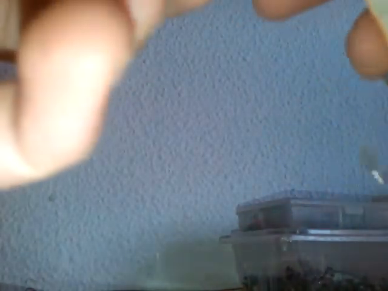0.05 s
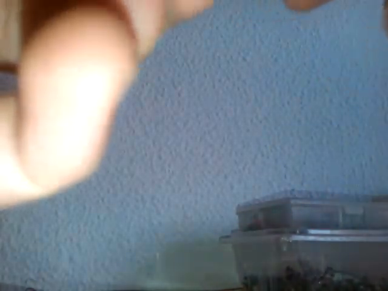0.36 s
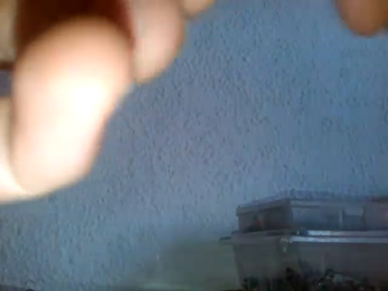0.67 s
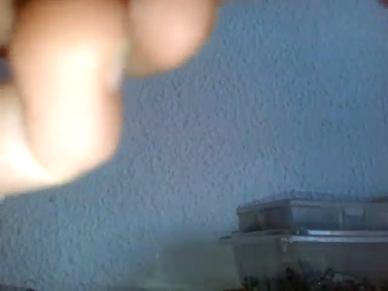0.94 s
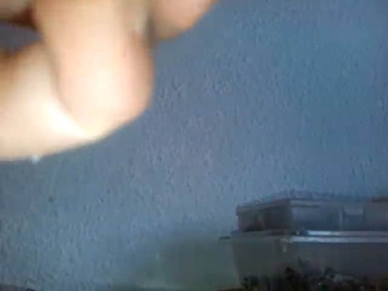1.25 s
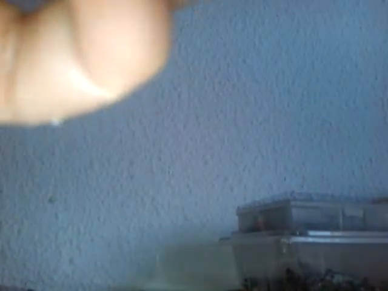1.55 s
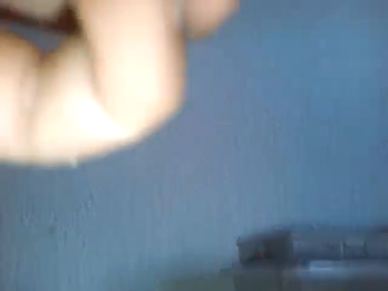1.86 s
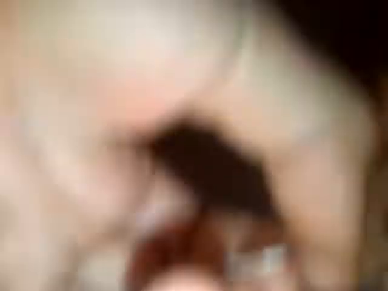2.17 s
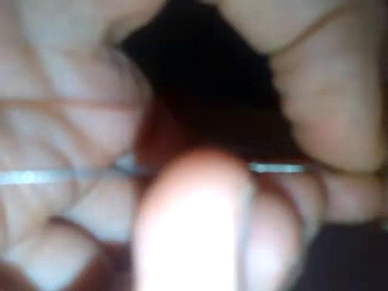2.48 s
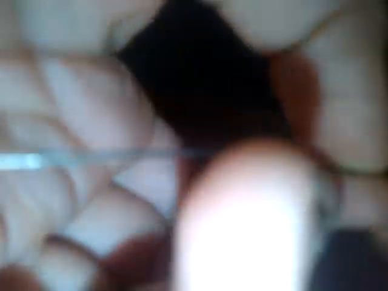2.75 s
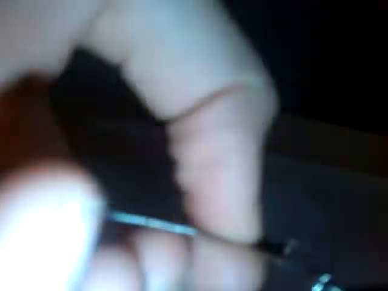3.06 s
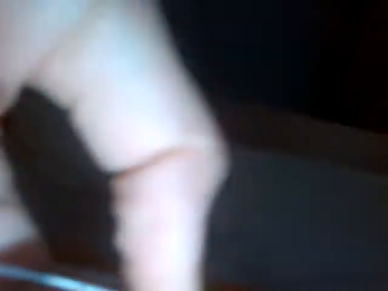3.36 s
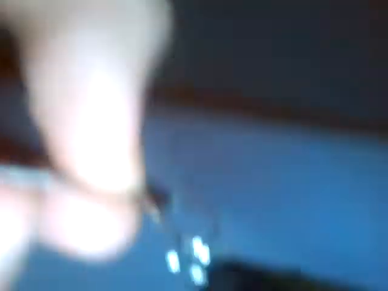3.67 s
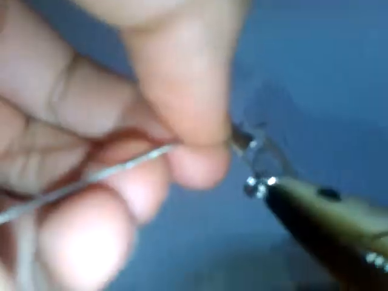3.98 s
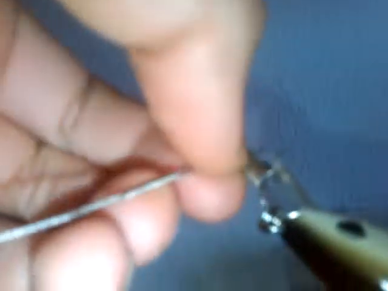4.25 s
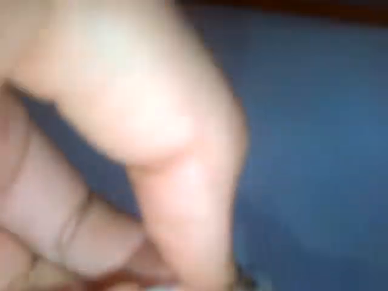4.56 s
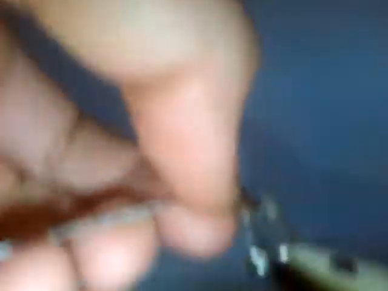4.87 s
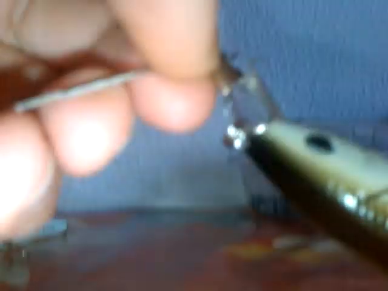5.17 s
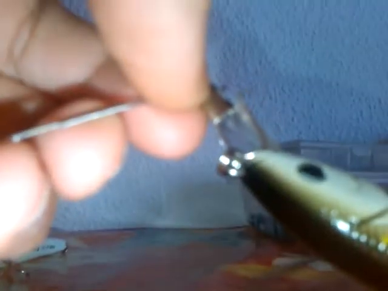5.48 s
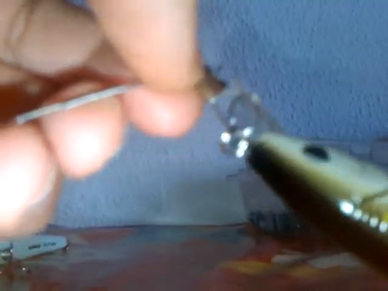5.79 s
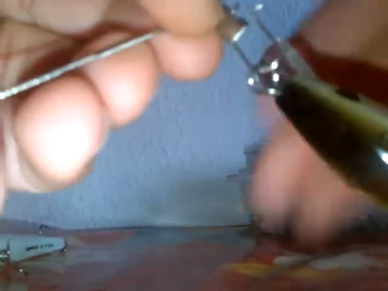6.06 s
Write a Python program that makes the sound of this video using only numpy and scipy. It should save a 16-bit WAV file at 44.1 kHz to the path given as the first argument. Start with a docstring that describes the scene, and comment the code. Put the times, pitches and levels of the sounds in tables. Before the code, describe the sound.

Fishing tackle is handled very close to a small microphone, dry, over quiet room tone and hiss. Hooks jingle briefly at 0.3 seconds, and a sharp metal click follows at 0.7, then faint ticks. Near 1.9 a clip clicks and steel wire judders and hisses through the fingers, followed at 2.1 by a loud snap, a hollow knock of the lure and a hand bumping the microphone. A short, squeaky zip comes at 2.2. From 2.5 to 3.4 small rings tick irregularly while a swivel grinds finely and hands brush softly. At 3.7 the wire hisses and squeaks again, stopping with a loud snap at 3.8. After a few light ticks, another swelling zip ends in a hard snap just before 5. The hardest snaps overload slightly. Sparse soft ticks and faint swivel scraping continue until about 6.3.

```python
"""Steel snap and rings click as a fishing lure is clipped to a leader, close to a small microphone.
Each click is a damped metal tick with a short steel ring and a knock in the hollow lure.
Hooks jingle, the swivel grinds, and the wire hisses and squeaks through the fingers, then stops
with a loud snap. Hands brush and bump, once against the microphone, over a quiet room tone.
The hardest snaps overload the input."""
import sys
import numpy as np
from scipy import signal
from scipy.fft import rfft, irfft, next_fast_len
from scipy.io import wavfile

SR = 44100
rng = np.random.default_rng(int(sys.argv[2]) if len(sys.argv) > 2 else 0)


def inscribe(sig):
    """Save sig as 16-bit PCM at rate SR to the path in sys.argv[1].

    A 1-D sig is mono; a 2-D sig holds one channel per row.
    Samples are clipped to [-1, 1] before scaling.
    """
    pcm = np.round(np.clip(np.atleast_2d(sig).T, -1, 1) * 32767)
    wavfile.write(sys.argv[1], SR, pcm.astype(np.int16))


N = 278855
TIME = np.arange(N) / SR
AGE = np.arange(SR // 8) / SR   # seconds since a contact


def from_db(db):
    """Decibels to gain."""
    return 10 ** (np.asarray(db) / 20)


def rms_one(x):
    """Scale to unit power."""
    return x / np.sqrt(np.mean(x ** 2) + 1e-20)


def peak_one(x):
    """Scale to unit peak."""
    return x / np.abs(x).max()


def fade(t60):
    """Decay after a contact: 60 dB down in t60 seconds."""
    return from_db(-60 * AGE / t60)


def add(out, s, sound):
    """Mix a one-shot in at s seconds."""
    at = round(s * SR)
    out[at:at + len(sound)] += sound[:N - at]


def cut(x, hz, kind, order=2):
    """Butterworth low- or high-pass."""
    return signal.sosfilt(signal.butter(order, hz, kind, fs=SR, output="sos"), x)


def low_noise(hz, size=N):
    """Low-passed noise at unit power."""
    return rms_one(cut(rng.standard_normal(size), hz, "low"))


def resonate(x, hz, width_hz):
    """One resonance with unit gain at its peak."""
    radius = np.exp(-np.pi * width_hz / SR)
    feedforward = np.array([1, 0, -1]) * (1 - radius ** 2) / 2
    feedback = [1, -2 * radius * np.cos(2 * np.pi * hz / SR), radius ** 2]
    return signal.lfilter(feedforward, feedback, x + 1e-18)


def ring(x, modes):
    """Parallel modes of one object; alternating signs keep the far skirts dark."""
    return sum((-1) ** k * from_db(db) * resonate(x, hz, width)
               for k, (hz, width, db) in enumerate(modes))


def colour(x, spectrum):
    """Shape noise with an EQ curve; unit power."""
    hz, db = np.transpose(spectrum)
    size = next_fast_len(N)
    bins = np.maximum(np.fft.rfftfreq(size, 1 / SR), 1)
    eq = from_db(np.interp(np.log(bins), np.log(hz), db))
    return rms_one(irfft(rfft(x, size) * eq, size)[:N])


def grains(per_s, spread_db, size=len(AGE)):
    """Random micro-contacts of uneven strength."""
    strength = from_db(spread_db * np.minimum(rng.exponential(1, size), 4))
    return strength * rng.choice([-1, 1], size) * (rng.random(size) < per_s / SR)


def tick(x, hz, width_hz, skirt_db=-16):
    """Metal pinched between fingers: one heavily damped resonance with broad skirts."""
    core = resonate(resonate(x, hz, width_hz), hz, width_hz)
    skirt = from_db(skirt_db) * resonate(x, 3700, 2900)
    edge = from_db(-30) * cut(x, 11000, "high")
    return core + skirt + edge


def strokes(rows, attack_s):
    """Rubbing envelope: each stroke sets in, ramps by its swell to its end level, and lets go."""
    out = np.zeros(N)
    for start, end, db, swell, release in rows:
        onset = np.clip((TIME - start) / attack_s, 0, 1)
        to_go = np.clip((end - TIME) / (end - start), 0, 1)
        let_go = np.clip(1 - (TIME - end) / release, 0, 1) ** 2
        out += onset * from_db(db - swell * to_go) * let_go
    return out


# room tone EQ: f/Hz, level/dB
ROOM_EQ = [(15, -34.5), (25, -12.5), (54, -5), (76, -10.5), (145, 2), (210, -5), (275, -5), (318, -9.5),
           (416, -1), (452, -10), (491, -3), (544, -7.5), (604, -6.5), (1500, -12), (3500, -23),
           (4550, -59), (7700, -120)]
# fader rides on the distant room noise: t/s, low band/dB, mid band/dB
ROOM_RIDES = [(0.0, -62.5, -63), (0.65, -63.5, -65), (0.88, -59.5, -64), (1.34, -66, -72),
              (1.78, -64, -68.5), (2.11, -56.5, -58.5), (2.41, -63, -62.5), (2.64, -60.5, -60.5),
              (4.08, -60, -62), (4.93, -64.5, -67), (5.32, -63.5, -67.5), (6.32, -58.5, -61)]
# drone partials: f/Hz, level/dB
DRONE = [(50, -76.5), (147, -77), (272, -74), (410, -78), (495, -77)]


def room(crossover_hz=500, air_trim_db=1, drone_trim_db=-3, hiss_db=-64.5):
    """The bed: dull room noise and a faint drone, over even microphone hiss."""
    low = cut(colour(rng.standard_normal(N), ROOM_EQ), crossover_hz, "low", order=4)
    mid = cut(colour(rng.standard_normal(N), ROOM_EQ), crossover_hz, "high", order=4)
    mid = cut(mid, 3200, "low", order=4)
    times, low_db, mid_db = np.transpose(ROOM_RIDES)
    air = from_db(np.interp(TIME, times, low_db)) * rms_one(low)
    air += from_db(np.interp(TIME, times, mid_db)) * rms_one(mid)
    drone = sum(from_db(db) * np.sqrt(2) * np.sin(2 * np.pi * hz * TIME + low_noise(5))
                for hz, db in DRONE)
    hiss = from_db(hiss_db) * rng.standard_normal(N)
    return from_db(air_trim_db) * air + from_db(drone_trim_db) * drone + hiss


# swivel turning on its rings: start/s, end/s, end level/dB, swell/dB, release/s
SWIVEL_TURNS = [(.73, .78, -64.5, -2, 0.092), (2.52, 2.68, -65, -1, .2), (2.8, 2.94, -56, 18.5, .03),
                (2.945, 2.988, -47.5, -5, 0.034), (3.098, 3.14, -53, -7, .1), (3.2, 3.43, -54, 9, 0.11),
                (4.02, 4.05, -65, 2, .06), (4.14, 4.16, -52.5, 4, 0.11), (4.23, 4.255, -58, 1.5, .05),
                (5.73, 5.89, -62, 15, 0.12), (6.1, 6.32, -60.5, 10, 0.058)]
# swivel resonances: f/Hz, width/Hz, level/dB
SWIVEL_MODES = [(2870, 180, -9), (3060, 140, -6.5), (4244, 1300, -8.5), (5440, 460, -6.5), (6420, 640, -4),
                (7100, 150, 2), (7530, 880, -9.5), (9800, 900, -21)]


def swivel():
    """A fine grind: tiny catches come in clumps and set the turning swivel ringing."""
    clumps = from_db(2.6 * low_noise(70))
    catches = clumps * grains(per_s=1600, spread_db=3.6, size=N)
    grind = rms_one(cut(ring(catches, SWIVEL_MODES), 9500, "low", order=4))
    return strokes(SWIVEL_TURNS, attack_s=0.015) * grind


# fingertip squeaks on the wire: t/s, length/s, start f/Hz, end f/Hz, level/dB
FINGER_SQUEAKS = [(2.02, .016, 2535, 2800, -47), (2.245, 0.019, 2350, 2790, -40.5),
                  (3.754, 0.014, 2170, 1760, -44.5), (3.78, 0.011, 2530, 2680, -40.5),
                  (4.918, 0.022, 677, 870, -49.5)]


def squeaks(waver=0.035):
    """Friction briefly locks into a gliding, unsteady chirp."""
    out = np.zeros(N)
    for s, length, start_hz, end_hz, db in FINGER_SQUEAKS:
        size = round(length * SR)
        hz = np.linspace(start_hz, end_hz, size) * (1 + waver * low_noise(400, size))
        chirp = np.sqrt(2) * np.sin(2 * np.pi * np.cumsum(hz) / SR)
        add(out, s, from_db(db) * np.hanning(size) * chirp)
    return out


def judder(start_s=1.872, end_s=1.985, slips_per_s=72):
    """Skin sticks to the wire, drags and slips: a low sawtooth with a tick at each slip."""
    phase = np.cumsum(slips_per_s * (1 + .04 * low_noise(30))) / SR
    drag = (phase - phase[round(start_s * SR)]) % 1
    slips = np.diff(drag, prepend=0) < -.5
    buzz = cut(2 * drag - 1, 170, "low")
    ticks = peak_one(tick(slips.astype(float), hz=5600, width_hz=5000))
    gate = np.clip(np.minimum(TIME - start_s, end_s - TIME) / .02, 0, 1)
    return gate * (from_db(-44) * buzz + from_db(-36) * ticks)


PULL_ATTACK_S = .024   # time for the wire to get moving
# wire drawn through the fingers: start/s, end/s, end level/dB, swell/dB, release/s
WIRE_PULLS = [(1.9, 2.037, -37, 25.5, 0.031), (2.06, 2.13, -51, -5.5, .14), (2.215, 2.265, -36, 12.5, 0.14),
              (3.692, 3.84, -32, 11, .035), (4.82, 4.945, -35.5, 24.5, .02)]
# bright friction EQ of the wire: f/Hz, level/dB
WIRE_EQ = [(900, -30.5), (1800, -14.5), (2700, -8), (3400, -5.5), (5200, -2.5), (7200, 0.5), (10000, -6.5),
           (11500, -11.5), (13500, -26.5), (16000, -30)]


def wire():
    """A zipping hiss: twisted strands catch on skin thousands of times a second, under a wavering grip."""
    grip = from_db(1.6 * low_noise(160))
    friction = colour(grains(per_s=6000, spread_db=4.1, size=N), WIRE_EQ)
    return strokes(WIRE_PULLS, PULL_ATTACK_S) * grip * friction


# hand thumps and hollow lure knocks: t/s, level/dB, f/Hz
THUMPS_AND_KNOCKS = [(1.8613, -33, 510), (2.071, -3.5, 183), (2.07, -5.5, 665), (2.0706, -5, 1380),
                     (2.075, -12, 380), (2.09, -15.5, 455), (2.118, -29, 130), (2.223, -30, 89),
                     (3.13, -31.5, 132), (3.148, -33, 83), (3.153, -30, 219), (3.1537, -26, 1540),
                     (3.1997, -37.5, 590), (3.8384, -22.5, 400), (3.84, -19.5, 899), (4.392, -39, 110),
                     (4.9494, -21.5, 379), (4.9487, -20.5, 1100), (4.951, -30, 140)]


def thumps_and_knocks():
    """Quickly damped tones: dull thumps of the hands, and hollow knocks of the lure at the loud snaps."""
    out = np.zeros(N)
    for s, db, hz in THUMPS_AND_KNOCKS:
        t60 = 0.016 * (300 / hz) ** 0.41   # higher tones die sooner
        tone = np.sin(2 * np.pi * hz * AGE)
        rustle = from_db(-17) * low_noise(2000, len(AGE))
        add(out, s, from_db(db) * fade(t60) * (tone + rustle))
    return out


# hand brushing the casing: start/s, end/s, end level/dB, swell/dB, release/s
HAND_BRUSHES = [(2.06, 2.13, -42.5, -12, 0.069), (2.215, 2.33, -60.5, -1, .08),
                (2.94, 2.965, -49.5, 3.5, 0.024), (3.1, 3.15, -53.5, 7.5, 0.28),
                (3.825, 3.845, -46, 7, .04), (4.93, 4.952, -41.5, 15.5, 0.018)]
# muffled EQ of the casing: f/Hz, level/dB
CASING_EQ = [(30, 1), (100, 1.5), (250, -3), (500, -6), (1000, -6), (1700, -12), (3000, -27), (8000, -50.5)]


def brushes(wire_bleed_db=-26):
    """Handling noise: skin brushes the casing, and the hand carries the wire's friction into it."""
    rubbing = strokes(HAND_BRUSHES, attack_s=.012)
    bleed = from_db(wire_bleed_db) * strokes(WIRE_PULLS, PULL_ATTACK_S)
    return (rubbing + bleed) * colour(grains(per_s=3000, spread_db=5.6, size=N), CASING_EQ)


# hooks swinging into each other: t/s, level/dB
HOOK_HITS = [(0.2959, -23), (0.3003, -26), (0.3023, -35), (0.3067, -39), (0.3151, -36), (0.3322, -32.5),
             (0.3443, -37.5), (0.423, -44)]
# hook resonances: f/Hz, width/Hz, level/dB
HOOK_MODES = [(2800, 145, -8), (4700, 400, -10), (5840, 220, -6), (6300, 160, -1), (7700, 580, -4),
              (8500, 360, -9), (9540, 360, 5), (10130, 270, -16), (11400, 1200, -19), (12900, 2400, -8.5)]


def hooks():
    """A bright jingle: free hooks strike, then shiver on their rings."""
    out = np.zeros(N)
    strike = from_db(-1) * peak_one(ring(signal.unit_impulse(len(AGE)), HOOK_MODES))
    burst_and_tail = from_db(-3) * fade(0.0083) + from_db(-19) * fade(0.095)
    for s, db in HOOK_HITS:
        shiver = rms_one(ring(grains(per_s=7000, spread_db=1.5), HOOK_MODES))
        add(out, s, from_db(db) * (strike + burst_and_tail * shiver))
    return out


# resonances of the steel parts: f/Hz, width/Hz, level/dB
STEEL_MODES = [(2748, 130, 3), (3322, 200, -2.5), (4400, 600, -8.5), (5600, 280, -10), (6586, 350, -0.5),
               (7123, 180, -12.5), (7840, 250, -1.5), (10250, 550, -12.5), (13600, 670, -16)]
# resonances of the hollow lure: f/Hz, width/Hz, level/dB
LURE_MODES = [(410, 140, 0.5), (830, 200, -0.5), (1030, 370, -1), (1500, 260, -1.5), (2270, 400, 1)]
# snap, swivel and rings touching: t/s, tick level/dB, f/Hz, width/Hz, ring send/dB, knock send/dB
METAL_HITS = [(0.6656, -6.5, 6120, 3200, -62, -39), (0.715, -46, 3800, 7000, -48.5, -48),
              (0.724, -36, 7750, 4200, -46.5, -66), (1.3153, -48, 6800, 3000, -57, -70),
              (1.333, -39.5, 3680, 2400, -55.5, -68), (1.4268, -40, 6500, 3200, -55.5, -66),
              (1.4677, -34.5, 6200, 7000, -55, -66), (1.8205, -39, 10400, 1800, -49, -68),
              (1.845, -29, 5200, 7000, -58, -66), (1.8504, -26, 3750, 7000, -40, -50),
              (1.8542, -8.5, 5370, 3400, -54, -26), (1.8605, -20.5, 5650, 2420, -39, -22),
              (2.0583, -27, 6200, 7000, -47, -47), (2.0666, -2.5, 6160, 3270, -18, -32),
              (2.0706, 4.5, 6500, 2600, -29, -8.5), (2.119, -23, 4400, 7000, -54, -42),
              (2.124, -27, 4600, 5500, -42, -47), (2.2195, -28, 4060, 5500, -46, -61),
              (2.542, -32.5, 6500, 1800, -47, -38), (2.5687, -33, 3680, 7000, -72, -72),
              (2.623, -35, 7240, 1800, -44, -66), (2.6494, -23, 6140, 4200, -39.5, -29.5),
              (2.674, -29.5, 4600, 5500, -55, -61), (2.9495, -24, 5000, 7000, -35, -25.5),
              (2.9532, -9.5, 7100, 5000, -31.5, -46), (2.9671, -23, 4370, 7000, -54, -23.5),
              (2.9733, -27, 5200, 5500, -50, -66), (3.0182, -36, 3800, 5500, -49, -33),
              (3.0262, -37, 3800, 5500, -57, -65), (3.1258, -28.5, 3750, 5500, -55, -60),
              (3.1295, -27, 3460, 1800, -49, -25.5), (3.1465, -34, 6800, 1500, -52, -49),
              (3.1794, -29, 4200, 7000, -53, -57), (3.184, -30, 4780, 4200, -59, -49),
              (3.2162, -29, 6700, 1300, -52, -66), (3.2476, -35, 3800, 7000, -58, -69),
              (3.2634, -25.5, 7100, 1290, -39.5, -52), (3.3103, -26, 6900, 1300, -35, -40),
              (3.3343, -28, 3580, 5400, -56, -69), (3.3968, -15, 5630, 3200, -64, -31),
              (3.407, -26.5, 3770, 4200, -52, -61), (3.4142, -35, 3960, 7000, -45, -66),
              (3.7842, -15, 5900, 7000, -44, -54), (3.839, 7.5, 5750, 1900, -53, -19),
              (3.853, -47, 5600, 5500, -59, -62), (4.003, -29, 5600, 2400, -73, -73),
              (4.1544, -38, 4800, 5500, -56, -71), (4.39, -27, 3760, 4200, -66, -31),
              (4.4042, -31.5, 5060, 7000, -66, -65), (4.4145, -31.5, 6400, 7000, -56, -66),
              (4.9492, 7, 7200, 5440, -48, -23), (4.9503, -7.5, 3700, 2400, -53, -38),
              (4.9574, -24, 5600, 7050, -54, -48), (4.965, -33, 5600, 4210, -56, -66),
              (5.1444, -40, 5000, 5000, -62, -70), (5.1633, -27.5, 5660, 2400, -74, -64),
              (6.1431, -31, 6350, 3200, -47, -69), (6.2795, -36, 3730, 5500, -55, -73)]


def clicks(scrape_s=0.0071, chatter_t60=0.0065, ring_t60=0.036, settle_db=-46.5):
    """Metal slips home: a scrape, a tick with a knock in the lure, tiny rebounds and a steel ring."""
    out = np.zeros(N)
    blow = signal.unit_impulse(len(AGE))
    knock = peak_one(cut(ring(blow, LURE_MODES) + from_db(-12) * blow, 2700, "low"))
    lead_in = np.linspace(0, 1, round(scrape_s * SR)) ** 3
    for s, tick_db, hz, width, ring_db, knock_db in METAL_HITS:
        contact = peak_one(tick(blow, hz, width))
        add(out, s, from_db(tick_db) * contact + from_db(knock_db - 2) * knock)

        # hard blows and loose parts both chatter
        chatter_gain = from_db(tick_db - 19) + from_db(ring_db + 0.5)
        rebounds = rms_one(tick(grains(per_s=12000, spread_db=7.5), hz, width)) * fade(chatter_t60)
        # every contact point weights the modes in its own way
        modes = [(mode_hz, mode_width, db + rng.normal(0, 4.2))
                 for mode_hz, mode_width, db in STEEL_MODES]
        steel = rms_one(ring(grains(per_s=5000, spread_db=3.5), modes)) * fade(ring_t60)
        add(out, s + 0.00037, chatter_gain * rebounds + from_db(ring_db + 1) * steel)

        # the loose part scrapes into the hit and settles after it with one light touch
        scrape = rms_one(tick(grains(per_s=9000, spread_db=3), hz, width, skirt_db=-7))
        add(out, s - scrape_s, from_db(ring_db - 9.5) * lead_in * scrape[:len(lead_in)])
        add(out, s + rng.uniform(.003, .012), from_db(settle_db) * contact)
    return out


def scene():
    """A close, dry mono mix of tackle, hands and room tone."""
    metal = clicks() + hooks() + swivel()
    wire_friction = wire() + squeaks() + judder()
    return (metal + wire_friction + thumps_and_knocks() + brushes() + room())[None]


def record(dry):
    """The input soft-clips on the hardest snaps; the deepest bass and highest treble are cut."""
    ceiling, top_hz = .69, 15900
    clipped = dry / (1 + (dry / ceiling) ** 4) ** (1 / 4)
    steep_lowpass = signal.ellip(8, .1, 60, top_hz, fs=SR, output="sos")
    return signal.sosfilt(steep_lowpass, cut(clipped, 30, "high", order=1))


dry = scene()
out = record(dry)
inscribe(out)
```